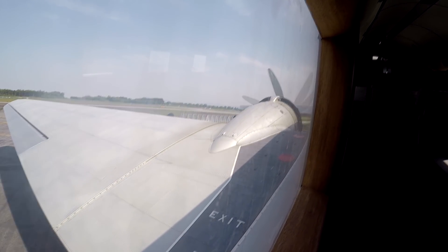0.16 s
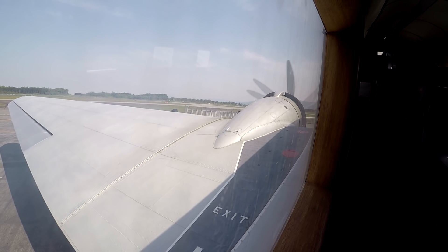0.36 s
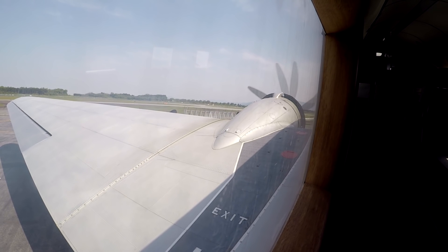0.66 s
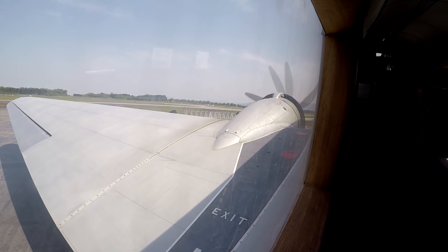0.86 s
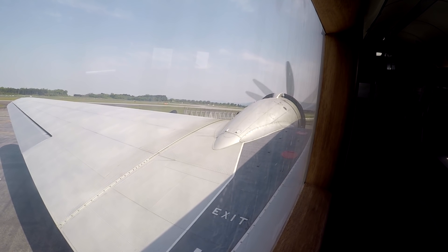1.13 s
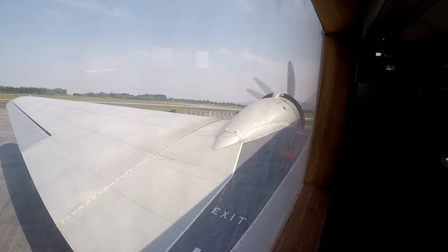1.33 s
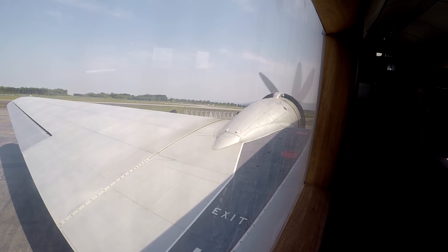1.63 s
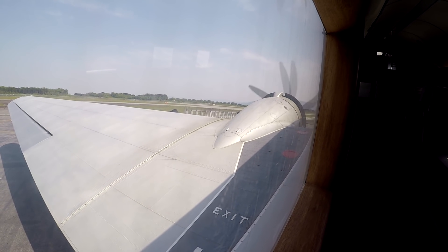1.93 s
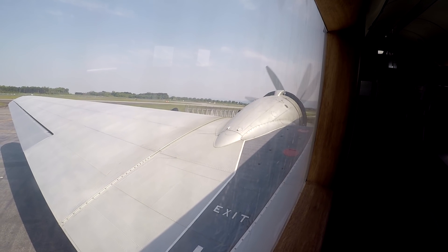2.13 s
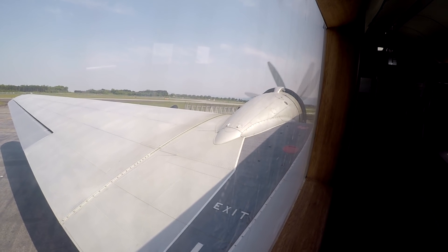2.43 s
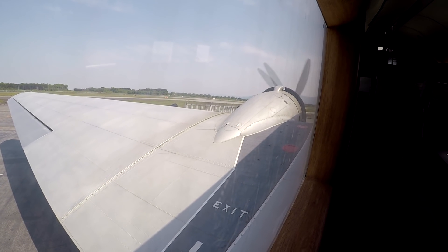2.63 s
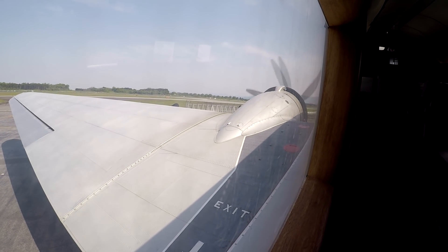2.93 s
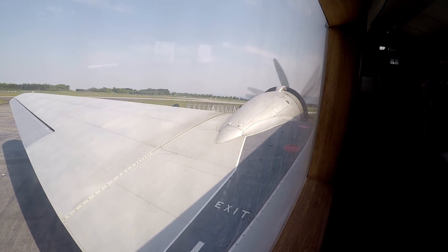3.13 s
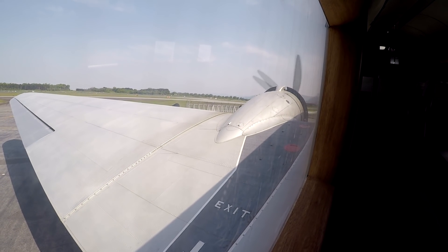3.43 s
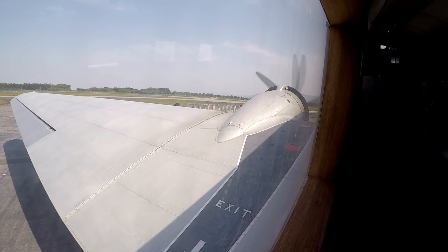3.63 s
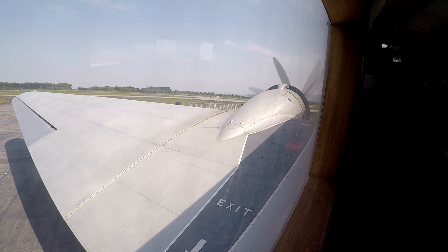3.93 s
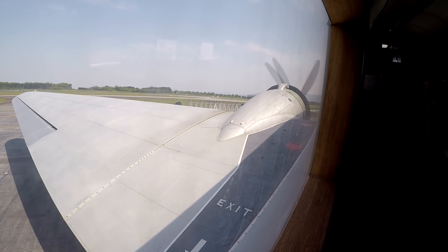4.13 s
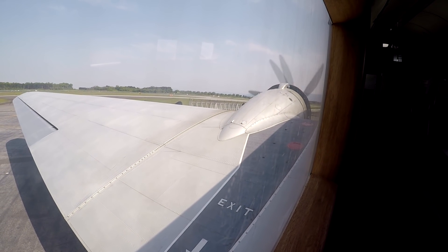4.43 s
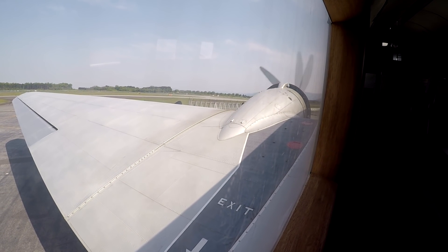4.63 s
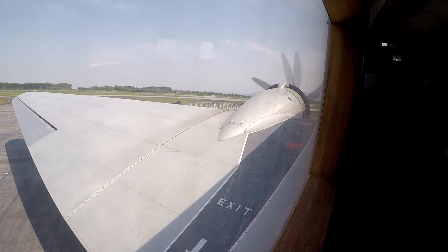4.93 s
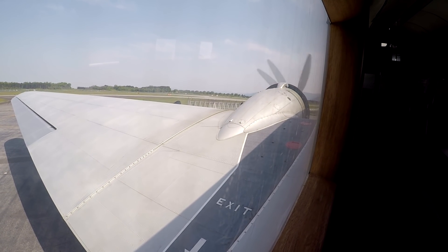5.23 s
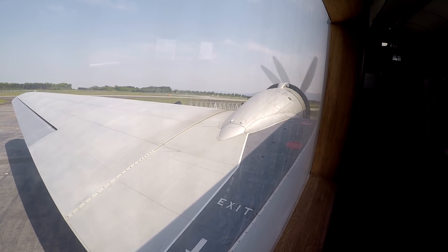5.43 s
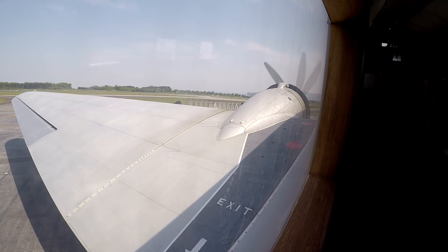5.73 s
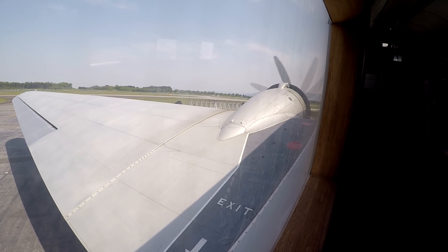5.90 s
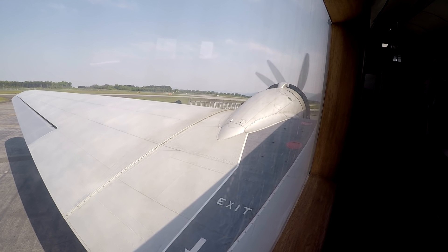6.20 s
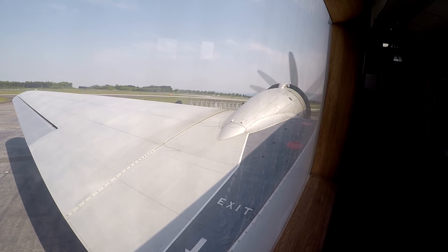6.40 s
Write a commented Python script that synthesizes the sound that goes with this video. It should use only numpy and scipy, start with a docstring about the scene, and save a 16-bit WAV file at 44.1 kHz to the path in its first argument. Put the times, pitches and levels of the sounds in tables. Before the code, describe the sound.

A loud, continuous, bass-heavy engine drone fills an aircraft cabin, already running at the start and never stopping. The pitch drifts slowly down, up and down again against a steadier second engine, with pulsing beats and a faint wavering gear whine. Small dry plastic-like ticks and knocks come from loose panels; midway, clothing brushes softly near the microphone. The low end is thick and softly distorted.

```python
"""A fourteen-cylinder radial engine hunts slowly around fast idle, heard inside an aircraft cabin.
From the start its exhaust orders, propeller and gear whine, all sines locked to one crankshaft, beat against
the steady sines of a second engine, over patchy filtered noise for exhaust roar and the hiss of slipstream and vents.
Loose trim soon begins to tick in decaying modes and grit; around 4 s cloth rustles in strokes of tiny slips.
Throughout, the loud bass drives the microphone into soft overload."""
import sys
import numpy as np
from scipy import signal
from scipy.fft import rfft, irfft
from scipy.io import wavfile
from scipy.ndimage import uniform_filter1d, map_coordinates

SR = 44100
rng = np.random.default_rng(int(sys.argv[2]) if len(sys.argv) > 2 else 0)


def waveform_to_disk(signal):
    """Save audio, clipped to [-1, 1], as 16-bit WAV at the path in sys.argv[1]."""
    frames = np.transpose(np.atleast_2d(signal))
    scaled = np.clip(frames, -1, 1) * 32767
    samples = np.round(scaled).astype(np.int16)
    wavfile.write(sys.argv[1], SR, samples)


N = 289296
T = np.arange(N) / SR


def amp(db):
    """Decibels to gain."""
    return 10 ** (np.asarray(db) / 20)


def evened(x):
    """Scales to rms 1."""
    return x / np.sqrt(np.mean(x ** 2) + 1e-20)


def curves(table, t):
    """Reads every column of a table at the times t."""
    time_s, *columns = np.transpose(table)
    return [np.interp(t, time_s, column) for column in columns]


def wander(steps_per_s):
    """Smooth random drift of rms 1, passing through steps_per_s random values a second."""
    steps = rng.standard_normal(200)
    coarse_s = T[::256]
    drift = map_coordinates(steps, [coarse_s * steps_per_s], order=3)
    return np.interp(T, coarse_s, evened(drift))


def bump(hz, mode):
    """Boost in dB of one resonance at the frequencies hz."""
    centre_hz, width_hz, boost_db = mode
    return boost_db / (1 + (2 * (hz - centre_hz) / width_hz) ** 2)


def band(x, hz, octaves):
    """Band-pass around hz, scaled to peak 1."""
    edges = hz * 2 ** (octaves / 2 * np.array([-1, 1]))
    out = signal.sosfilt(signal.butter(4, edges, "bandpass", fs=SR, output="sos"), x)
    return out / abs(out).max()


def tone(turns, rms_db, uneven_db, slip_rad):
    """A sine on a running count of turns whose level and phase waver slowly."""
    phase = 2 * np.pi * (turns + rng.random()) + slip_rad * wander(3.123)
    return np.sqrt(2) * amp(rms_db + uneven_db * wander(2.9)) * np.sin(phase)


def crankshaft():
    """Turns a second of the hunting engine, and how far up its range it is (0 slow, 1 fast)."""
    # hunting speed before smoothing: time_s [s], speed_rpm [rpm]
    speed_points = [(0, 916.3), (.45, 898), (.9, 868.2), (1.5, 903.5), (2.2, 942), (2.7, 964.7), (3.5, 980),
                    (4.1, 971), (4.6, 955.4), (5.2, 903.7), (5.8, 879.6), (6.2, 867.3), (6.56, 858)]
    slow_rpm, fast_rpm = 860, 980
    rpm = uniform_filter1d(curves(speed_points, T)[0], SR // 3)  # inertia: averaged over a third of a second
    return rpm / 60, (rpm - slow_rpm) / (fast_rpm - slow_rpm)


def exhaust_orders(crank_hz, crank_turns, fast):
    """Tones at multiples of the four-stroke cycle sweep with the speed through the airframe's modes."""
    # engine tones: multiple of the cycle rate, slow_db [rms dB before airframe boost], fast_db [same]
    orders = [(2, -27.5, -37), (3, -32.5, -30), (4, -25.5, -23.5), (5, -24, -45), (6, -35, -37),
              (7, -32, -42), (8, -48.5, -40.5), (9, -31, -28.5), (10, -20, -37), (11, -34.5, -29.5),
              (12, -43.5, -36.5), (13, -32, -43.5), (14, -23, -26.5), (15, -30.5, -37.5), (16, -28, -33),
              (17, -34.5, -29.5), (18, -33.5, -33), (19, -26, -27), (20, -37.5, -44.5), (21, -40, -46.5),
              (23, -34.5, -44), (24, -43, -39), (26, -39.5, -49), (27, -41, -47.5), (28, -37.5, -45.5),
              (33, -42, -56), (35, -47.5, -47), (39, -46, -53), (42, -47, -47), (44, -51, -56),
              (49, -49, -50.5)]
    # airframe modes that the tones sweep through: centre_hz [Hz], width_hz [Hz], boost_db [dB]
    airframe_modes = [(31.7, 5.3, 11), (147.6, 4.4, 4.5), (191.6, 5.5, 7), (223.4, 2.7, 3.5)]
    out = np.zeros(N)
    for multiple, slow_db, fast_db in orders:
        order_hz = multiple * crank_hz / 2  # one cycle takes two turns
        level_db = slow_db + (fast_db - slow_db) * fast
        level_db = level_db + sum(bump(order_hz, mode) for mode in airframe_modes)
        # high orders smear most
        out += tone(multiple * crank_turns / 2, level_db, 0.32 + .03 * multiple, 0.016 + 0.001 * multiple)
    return out


def propeller(crank_turns, fast):
    """Blade passes sound at multiples of the blade rate, geared down from the crankshaft."""
    # blade-pass tones: multiple of the blade rate, slow_db [rms dB], fast_db [rms dB]
    blade_passes = [(1, -28.5, -22), (2, -21.5, -32.5), (3, -37, -50), (4, -30.5, -37)]
    blades_per_turn = 3 * 9 / 16  # three blades behind a 16:9 reduction gear
    out = np.zeros(N)
    for multiple, slow_db, fast_db in blade_passes:
        level_db = slow_db + (fast_db - slow_db) * fast
        out += tone(multiple * blades_per_turn * crank_turns, level_db, .5, 0.25)
    return out


def gear_whine(crank_turns):
    """Gear teeth meet 42 times a turn, in a whine of unsteady pitch and level."""
    # course of the whine: time_s [s], level_db [rms dB before its flutter]
    whine_level = [(0, -41), (.3, -63), (.8, -39.5), (1.1, -60), (1.45, -45.5), (1.6, -44), (1.95, -40.5),
                   (2.15, -43.5), (2.3, -53), (2.9, -56.5), (3.3, -51.5), (3.7, -48), (4.0, -51.5),
                   (4.5, -54), (4.9, -47.5), (5.2, -43.5), (5.5, -51), (5.9, -42), (6.56, -49)]
    teeth = 42
    turns = teeth * crank_turns + 0.078 * wander(22)
    level_db = curves(whine_level, T)[0] + 3.0 * wander(15)
    return tone(turns, level_db, 1.6, 0.46)


def drone(fast):
    """The second engine holds its speed, fainter while the hunting engine runs fast."""
    # drone tones: multiple of the firing tone, relative_db [dB]
    drone_tones = [(.5, -5), (1, 1), (1.5, -11), (2, -30.5)]
    firing_hz, slow_db, fast_db = 67.46, -18.5, -22
    level_db = slow_db + (fast_db - slow_db) * fast
    return sum(tone(multiple * firing_hz * T, level_db + relative_db, 0.51, 0.16)
               for multiple, relative_db in drone_tones)


def patchy_noise():
    """Noise whose level drifts in patches of time and frequency, most of all in the bass."""
    frames = N // 256 + 5
    re, im, patches = rng.standard_normal((frames, 513, 3)).T
    patches = uniform_filter1d(patches, 10, 0)  # blur across frequency
    patches = evened(uniform_filter1d(patches, 16, 1))  # blur across time
    spread_db = np.geomspace(1.6, .6, len(re))[:, None]
    spectrum = (re + 1j * im) * amp(spread_db * patches)
    return evened(signal.istft(spectrum, nperseg=1024, noverlap=768)[1][:N])


def roar(cycles):
    """Patchy noise coloured by wall and panels, throbbing lightly with each firing, under flickering hiss."""
    # exhaust and slipstream roar through the cabin wall: pitch_hz [Hz], relative_db [dB per Hz]
    roar_colour = [(8, -28), (14, -9.5), (34, -6), (45, -19.5), (60, -5.5), (85, -13), (110, -9.5),
                   (145, -14), (200, -14), (267, -26), (470, -27.5), (660, -34), (735, -39), (1460, -45.5),
                   (2150, -62)]
    # hiss of slipstream and vents: pitch_hz [Hz], relative_db [dB per Hz on the scale of the roar]
    hiss_colour = [(1500, -72), (2600, -61), (3570, -58), (4700, -61.5), (5500, -65.5), (7500, -72.5),
                   (10100, -74.5), (14900, -93)]
    # cabin panels that the roar rings: centre_hz [Hz], width_hz [Hz], boost_db [dB]
    panels = [(328.5, 19.3, 9), (463, 18, 6), (585, 5.2, 7.5), (3000, 89, 6.5), (3410, 340, 3)]
    # course of both: time_s [s], roar_db [rms dB from 200 to 1200 Hz], hiss_db [dB on the same scale]
    roar_level = [(0, -27, -28.5), (.6, -28.5, -28.5), (1.5, -28.5, -28.5), (2.2, -29, -28.5),
                  (2.9, -28.5, -29), (3.6, -30.5, -29.5), (4.4, -31, -29.5), (5.1, -29.5, -30),
                  (5.8, -30, -30), (6.56, -28.5, -30)]
    noise = patchy_noise() * (1 + 0.1 * np.cos(2 * np.pi * 14 * cycles))  # 14 firings a cycle
    hz = np.fft.rfftfreq(N, 1 / SR)
    panels_db = sum(bump(hz, panel) for panel in panels)

    def colour_gain(colour):
        """Gain per frequency, read off a colour on a log scale, with the panels on top."""
        point_hz, point_db = np.transpose(colour)
        return amp(np.interp(np.log(hz + 1), np.log(point_hz + 1), point_db, left=-120) + panels_db)

    low_gain = colour_gain(roar_colour + [(8000, -120)])  # the roar dies out by 8 kHz
    high_gain = colour_gain(hiss_colour)
    scale = np.sqrt(np.mean(low_gain ** 2 * (hz > 200) * (hz < 1200)))
    spectrum = rfft(noise)
    low = irfft(spectrum * low_gain / scale, N)
    high = irfft(spectrum * high_gain / scale, N)
    roar_db, hiss_db = curves(roar_level, T)
    return amp(roar_db) * low + amp(hiss_db + 0.42 * wander(6.4)) * high


def ticks():
    """Contacts of loose trim: a light touch, a hit and a bounce ring its modes, with grit, knock and faint ring."""
    # ticks: start_s [s], level_db [peak dB of the ringing], pitch_hz [Hz], width [octaves],
    # grit_t60_s [s], knock_db [peak dB]
    tick_events = [(0.2184, -48, 5600, .5, .015, -60), (0.238, -34, 2300, 1.3, .022, -39),
                   (.27, -43, 3400, 0.37, .015, -61), (0.327, -40, 2930, 0.18, .03, -50),
                   (.531, -42, 3000, .7, 0.024, -44), (.66, -40, 3180, 0.52, .015, -53),
                   (0.6687, -27.5, 1750, 1.04, 0.027, -29), (.79, -38, 3200, .4, .1, -64),
                   (1.379, -39.5, 6026, 1.21, .015, -58), (1.702, -37.5, 2716, 0.22, .03, -60),
                   (1.7122, -21.5, 2370, 0.56, 0.026, -23.5), (1.772, -46, 2580, 0.23, 0.037, -57),
                   (1.792, -48, 2600, 0.18, 0.049, -58), (1.83, -52, 2680, .2, .04, -62),
                   (2.546, -38, 2882, 0.17, .058, -60), (2.607, -30.5, 3150, 0.42, .016, -32),
                   (3.2517, -35, 3020, 0.76, 0.081, -43), (3.253, -51, 10960, 0.94, .01, -62),
                   (4.2043, -42.5, 6860, 0.5, .012, -64), (4.204, -56, 12500, .4, .01, -63),
                   (4.7, -47, 3700, 0.6, 0.06, -44), (4.925, -39.5, 2900, 1.08, .016, -41),
                   (6.395, -31, 1600, 0.85, 0.021, -27.5)]
    # modes of the trim, each tick favours those near its pitch: pitch_hz [Hz], relative_db [dB], t60_s [s]
    trim_modes = [(1360, 7, 0.017), (1930, 0, 0.013), (2600, 1, 0.01), (3000, 1.5, 0.01),
                  (3490, -3, 0.0064), (5600, -8, 0.011), (6600, -1, 0.0073), (7400, -7.5, 0.0077),
                  (12500, -6, .008)]
    # faint narrow ring after a tick: pitch_hz [Hz], relative_db [dB re the tick], t60_s [s]
    after_ring = (2650, -24, 0.44)
    rise_s, bounce_s = 0.00083, 0.002023
    knock_hz, knock_octaves, knock_t60_s = 720, 2.48, 0.05  # the panel behind the trim
    snap_level = 4.5  # how far the first contact stands above the grit in the knock
    dull_hz = 900  # soft contacts: the grit falls off above this
    grit_db = -9  # noise of the contact under the ringing
    soft_cycles = 3  # a contact builds each mode up over this many cycles
    length = 8820  # samples, 0.2 s

    out, t = np.zeros(N + length), np.arange(length) / SR
    hit, bounce = round(rise_s * SR), round(bounce_s * SR)  # in samples
    rise = np.minimum(t / rise_s, 1) ** 2
    snap = snap_level * (np.arange(length) == hit)
    mode_hz, mode_db, mode_t60_s = np.transpose(trim_modes)[..., None]
    ring_hz, ring_db, ring_t60_s = after_ring
    draws = rng.standard_normal((len(tick_events), length))
    for (start_s, level_db, pitch_hz, octaves, grit_t60_s, knock_db), draw in zip(tick_events, draws):
        grit = signal.lfilter([1], [1, -np.exp(-2 * np.pi * dull_hz / SR)], np.sign(draw))

        near_db = -16 * (np.log2(mode_hz / pitch_hz) / octaves) ** 2
        rung_hz = mode_hz * (1 + 0.022 * draw[:len(trim_modes), None])
        start_rad = np.pi * draw[-len(trim_modes):, None]
        decay = amp(mode_db + near_db - 60 * t / mode_t60_s)
        build = np.sin(np.pi / 2 * np.minimum(rung_hz * t / soft_cycles, 1)) ** 2
        rung = (decay * build * np.sin(2 * np.pi * rung_hz * t + start_rad)).sum(0)
        rung = 0.12 * rung + np.roll(rung, hit) + 0.34 * np.roll(rung, bounce)

        contact = band(grit * rise * amp(-60 * t / grit_t60_s), pitch_hz, octaves)
        burst = rung / abs(rung).max() + amp(grit_db) * contact
        thud = snap + grit * rise * amp(-60 * t / knock_t60_s)
        knock = amp(knock_db) * band(thud, knock_hz, knock_octaves)
        ring = amp(ring_db) * band(grit * amp(-60 * t / ring_t60_s), ring_hz, 0.064)
        out[round(start_s * SR):][:length] += amp(level_db) * (burst + ring) + knock
    return out[:N]


def rustle():
    """Dense tiny slips of cloth in broad resonances, swelling and fading with each stroke."""
    # strokes near the microphone: start_s [s], rise_s [s], fall_s [s],
    # level_db [rms dB at the top of the swell, before unevenness], bright_db [dB, reached above 5 kHz]
    strokes = [(3.99, 0.059, 0.079, -46.5, -4), (4.069, .05, .12, -49, -2), (4.18, .07, 0.071, -51.5, -7),
               (4.27, 0.086, 0.094, -46.5, -2), (4.39, 0.052, 0.15, -52.5, -1),
               (4.685, .018, 0.049, -49, -1)]
    # colour of the cloth: centre_hz [Hz], width_hz [Hz], relative_db [dB]
    cloth = [(1410, 550, 1), (1860, 200, -1), (2750, 460, -1.5), (3480, 190, 3), (4120, 700, -2.5),
             (5230, 700, -12.5), (6350, 1100, -17)]
    fibres_per_s, fibre_db = 3000, 4.5  # rate of the larger slips, and how much their sizes spread
    sizes = amp(fibre_db * np.minimum(rng.exponential(1, N), 4))
    struck = rng.random(N) < fibres_per_s / SR
    slips = rng.standard_normal(N) * (.5 + sizes * struck)  # .5: a fine bed under the larger slips
    hz = np.fft.rfftfreq(N, 1 / SR)
    colour = sum(amp(relative_db) / (1 + (2 * (hz - centre_hz) / width_hz) ** 2)
                 for centre_hz, width_hz, relative_db in cloth)
    coloured = rfft(slips) * colour
    out, uneven = np.zeros(N), amp(1.5 * wander(25))
    for start_s, rise_s, fall_s, level_db, bright_db in strokes:
        top_s = start_s + rise_s
        swell = np.sin(np.pi / 2 * np.interp(T, [start_s, top_s, top_s + fall_s], [0, 1, 0]))
        brightness = amp(bright_db / (1 + (5000 / (hz + 1)) ** 8))
        out += amp(level_db) * swell * evened(irfft(coloured * brightness, N))
    return out * uneven


def scene():
    """Everything reaches one microphone."""
    crank_hz, fast = crankshaft()
    crank_turns = np.cumsum(crank_hz) / SR
    engine = exhaust_orders(crank_hz, crank_turns, fast) + propeller(crank_turns, fast) + gear_whine(crank_turns)
    cabin = drone(fast) + roar(crank_turns / 2)
    return (engine + cabin + ticks() + rustle())[None]


def record(dry):
    """Overload rounds off the peaks of the bass while the treble rides through; then the band limit."""
    ceiling, knee = .47, 4.0  # full scale is 1; a higher knee bends later and harder
    edge_hz = 15100
    split = signal.firwin(2047, 330, fs=SR)[None]  # bass below 330 Hz
    bass = signal.oaconvolve(dry, split, "same")
    rounded = bass / (1 + abs(bass / ceiling) ** knee) ** (1 / knee)
    # a second pass keeps the overtones of the overload out of the treble
    heard = dry - bass + signal.oaconvolve(rounded, split, "same")
    band_limit = signal.firwin(511, edge_hz, window=("kaiser", 9), fs=SR)[None]
    return signal.oaconvolve(heard, band_limit, "same")


dry = scene()
out = record(dry)
waveform_to_disk(out)
```